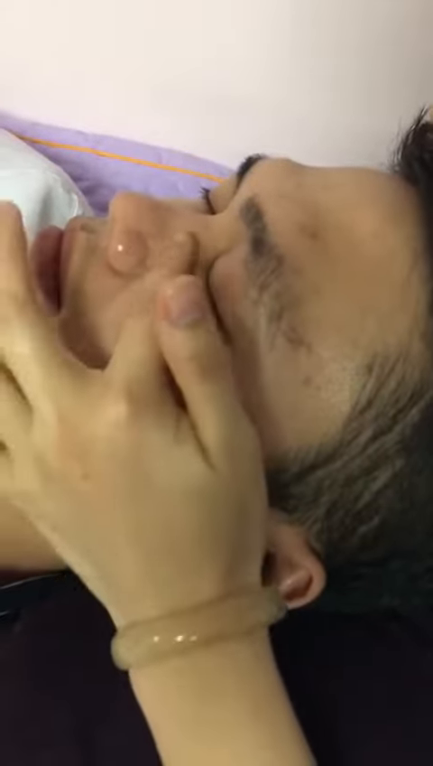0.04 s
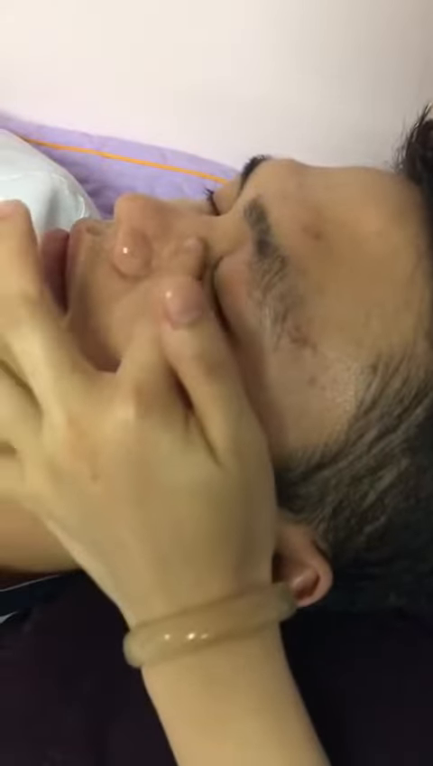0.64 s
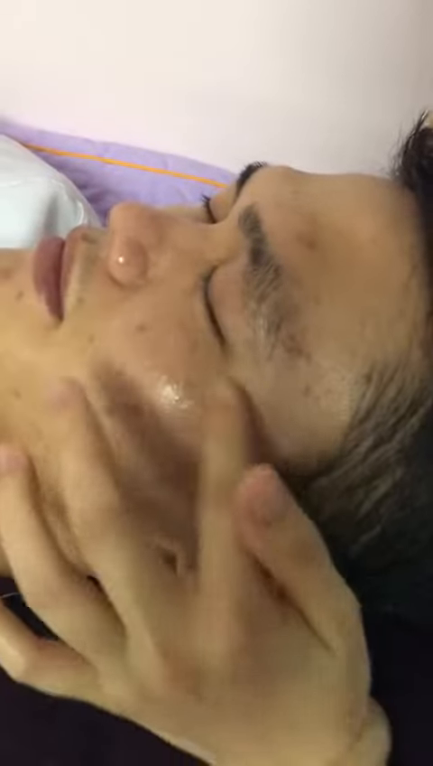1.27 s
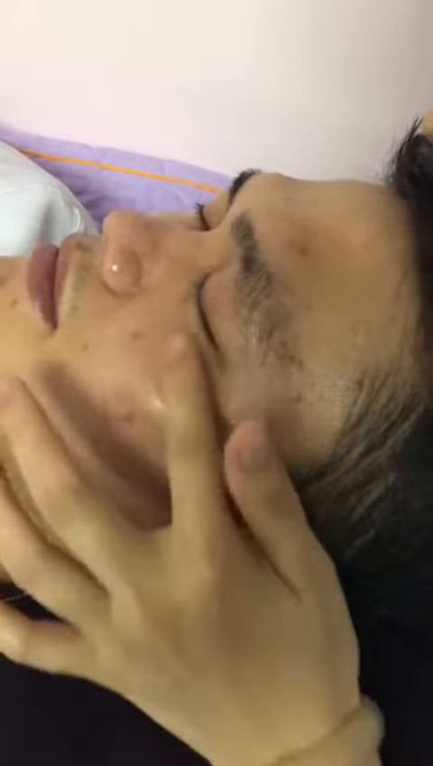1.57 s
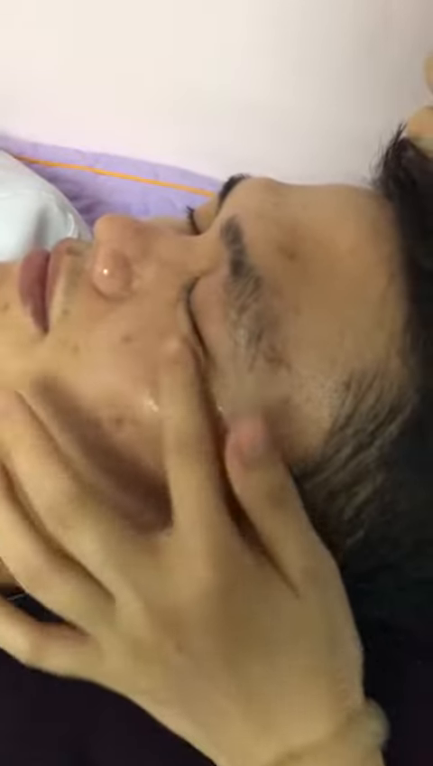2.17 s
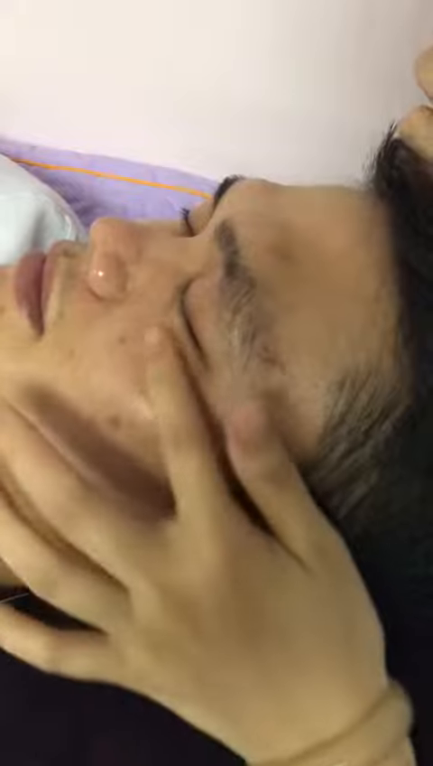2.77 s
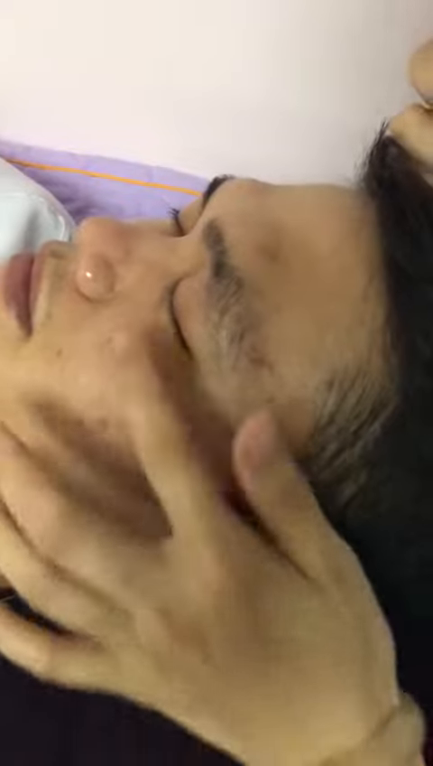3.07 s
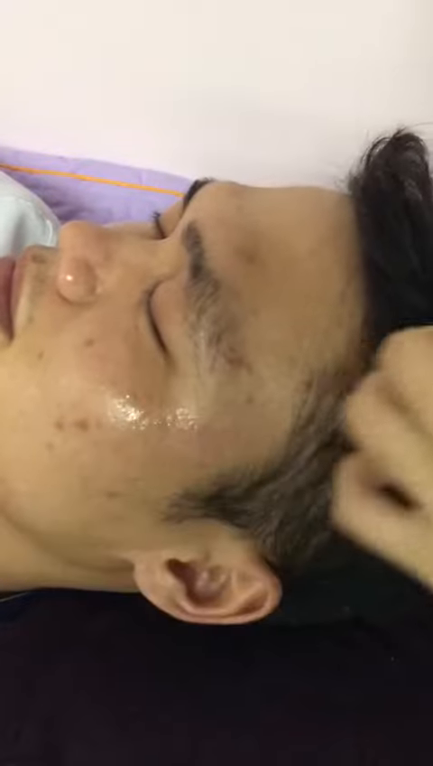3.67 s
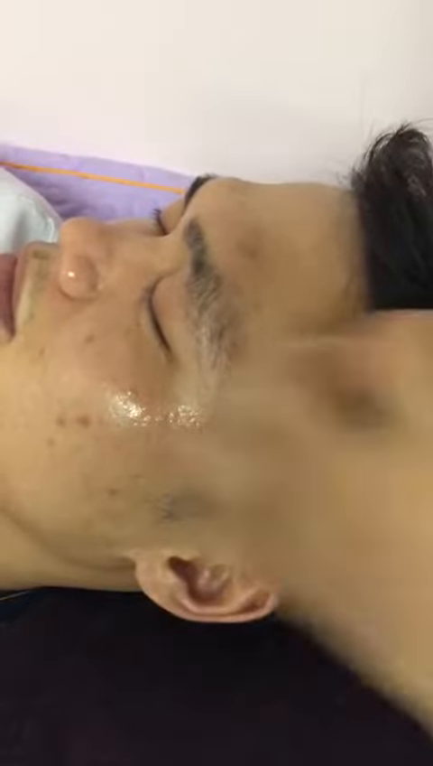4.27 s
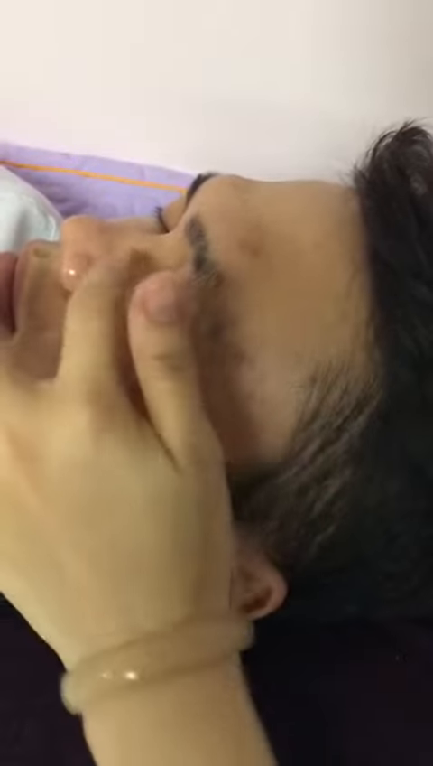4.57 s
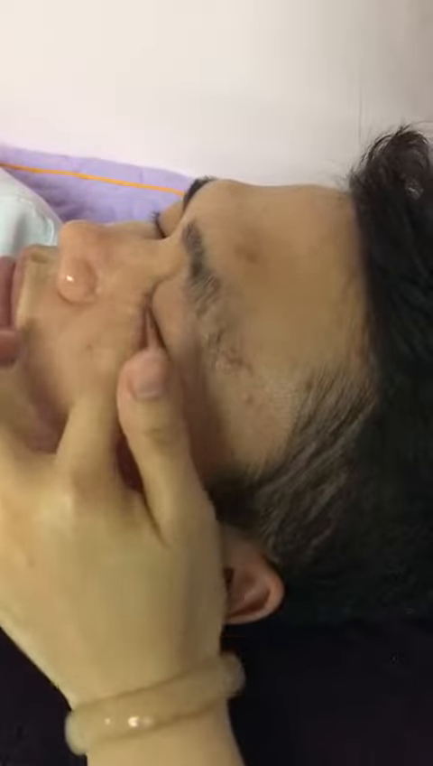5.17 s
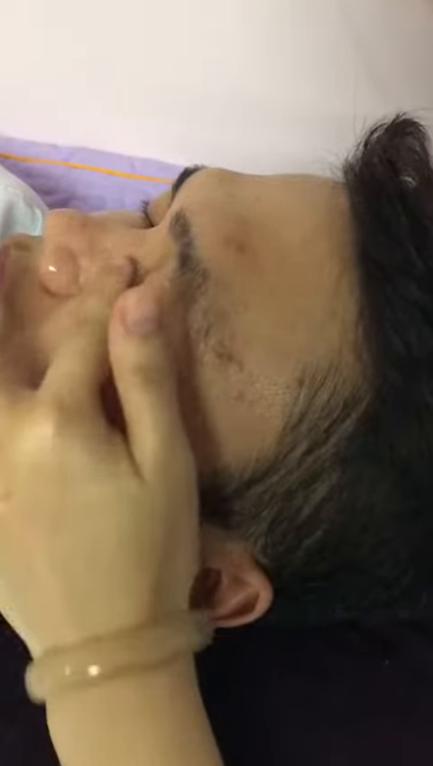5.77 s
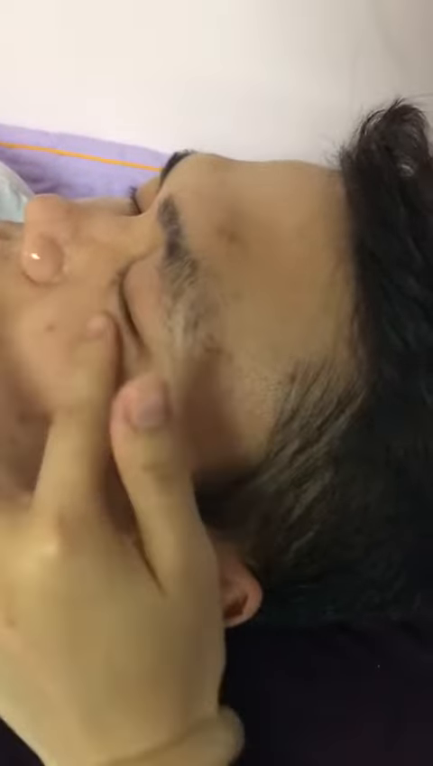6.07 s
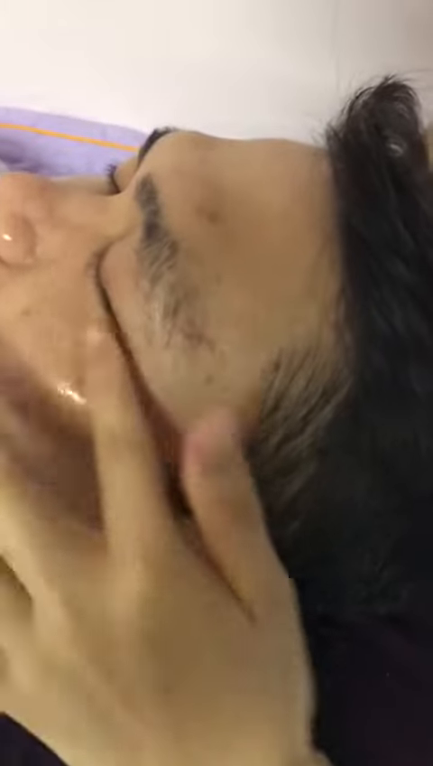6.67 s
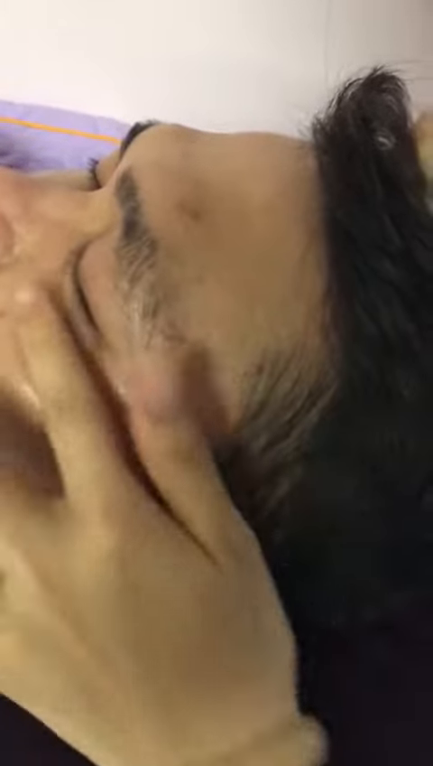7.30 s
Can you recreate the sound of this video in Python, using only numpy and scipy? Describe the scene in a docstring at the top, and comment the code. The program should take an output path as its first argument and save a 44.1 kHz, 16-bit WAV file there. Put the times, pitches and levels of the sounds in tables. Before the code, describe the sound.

A vacuum pump runs steadily in a small room, with a low throbbing electric hum, rushing air and a faint pulsing hiss.

```python
"""A vacuum pump runs in a small room. From the start its strokes throb, its induction motor hums and
whines, and air rushes; a worn ball bearing grumbles through the housing, its cage swishing and ticking.
Near 1.4 s the cage rubs harder. Around 3.6 s come a first faint squeak and a dip in the deep tone; the
whirr swells and sinks, and near 5 s the bearing runs dry for a while. Just after 6 s the cage rubs
hardest, with a last squeak and a hollow bump, and bands of the rush stand out towards the end."""
import sys
import numpy as np
from scipy import signal
from scipy.fft import rfft, irfft
from scipy.io import wavfile
from scipy.ndimage import uniform_filter1d

SR = 44100
rng = np.random.default_rng(int(sys.argv[2]) if len(sys.argv) > 2 else 0)


def to_wav(s):
    """Save 16-bit WAV."""
    ch = np.atleast_2d(s).T  # columns
    pcm = np.round(np.clip(ch, -1, 1) * 32767)  # PCM
    wavfile.write(sys.argv[1], SR, pcm.astype(np.int16))


N = 332514
TIME = np.arange(N) / SR
BIN_HZ = np.fft.rfftfreq(N, 1 / SR)
SHAFT_HZ, CAGE_HZ, MAINS_HZ = 24.364, 9.037, 49.985
FIRST_SWISH_S = 0.085


def amp(db):
    """Decibels to gain."""
    return 10 ** (np.asarray(db) / 20)


def unit(x):
    """Scales to rms 1."""
    return x / np.sqrt(np.mean(x ** 2) + 1e-20)


def bell(x):
    """A smooth hump around zero, of half width 1."""
    return np.exp(-np.minimum(x ** 2, 20))


def colour(points):
    """An EQ curve: gain at every bin, from (Hz, dB) points joined on a log-frequency axis."""
    hz, db = np.transpose(points)
    return amp(np.interp(np.log(BIN_HZ + 1), np.log(hz), db))


def noise(gain):
    """Noise of rms 1, shaped by a gain at every bin."""
    real, imaginary = rng.standard_normal((2, len(BIN_HZ)))
    return unit(irfft(gain * (real + 1j * imaginary), N))


def noise_band(hz, half_width_hz):
    """A bell-shaped band of noise, rms 1."""
    return noise(bell((BIN_HZ - hz) / half_width_hz))


def drift(rate_hz):
    """Random modulation of rms 1, up to about rate_hz."""
    return noise(bell(BIN_HZ / rate_hz))


def tone(hz, db, waver=0.06):
    """A sine that wavers slightly in level and phase."""
    angle = 2 * np.pi * (hz * TIME + rng.random())
    knots_s = np.linspace(0, TIME[-1], 40)
    swell = np.interp(TIME, knots_s, waver * rng.standard_normal(len(knots_s)))
    lag = np.interp(TIME, knots_s, waver * rng.standard_normal(len(knots_s)))
    return np.sqrt(2) * amp(db) * (1 + swell) * np.sin(angle + lag)


# The pump's tones, deepest first. Each row: multiple of the shaft speed, level in dB.
PUMP_TONES = [(2, -36.5), (3, -48), (4, -55), (5, -68), (6, -48), (7, -61), (8, -59.5), (9, -59.5),
              (10, -53), (12, -58), (13, -46), (14, -59.5), (15, -60), (17, -60), (19, -71), (39, -67.5)]


def pump(dip_s=3.68, dip_half_s=0.22, dip_db=-2):
    """Two strokes a turn give the deep tone, which dips once; the other shaft orders make it throb."""
    deep, *others = (tone(order * SHAFT_HZ, db, waver=0.032) for order, db in PUMP_TONES)
    dip = amp(dip_db * bell((TIME - dip_s) / dip_half_s))
    return deep * dip + sum(others)


# Magnetic hum. Each row: multiple of the mains, multiple of the shaft speed added, level in dB.
HUM_TONES = [(2, 0, -51.5), (2, 1, -46.5), (2, 2, -58), (4, 0, -60.5), (8, 0, -65)]
# Rotor-bar whine. Each row: multiple of the mains added to the bar rate, level in dB.
WHINE_TONES = [(4, -66), (6, -73), (8, -68), (10, -69), (12, -84)]


def motor(rotor_bars=30):
    """The magnetic pull beats with the off-centre rotor and with its passing bars."""
    hum = sum(tone(mains * MAINS_HZ + shaft * SHAFT_HZ, db, waver=0.013)
              for mains, shaft, db in HUM_TONES)
    bar_hz = rotor_bars * SHAFT_HZ
    whine = sum(tone(bar_hz + mains * MAINS_HZ, db, waver=0.2) for mains, db in WHINE_TONES)
    return hum + whine


# EQ of the housing as the rolling balls shake it. Each row: frequency in Hz, relative level in dB.
HOUSING_EQ = [(150, -6.5), (260, -3.5), (370, 1.5), (450, -2.5), (500, -3), (635, -15.5), (658, -3),
              (760, -5), (810, -4.5), (945, -4), (1030, -15), (1095, 0), (1165, -11), (1205, -4),
              (1370, -43)]
# Shaft orders split by the bearing. Each row: multiple of the shaft speed,
# multiple of the cage speed added, level in dB.
BEARING_TONES = [(2, 1, -63), (4, -3, -56.5), (4, -1, -57.5), (6, -1, -69.5), (6, 1, -69), (7, -2, -64.5),
                 (7, -1, -63.5), (9, 1, -61.5), (10, -1, -58), (10, 1, -57.5), (14, 1, -60), (15, -1, -65),
                 (15, 1, -65.5), (17, -1, -63), (30, -1, -74), (34, -2, -66), (37, -1, -71.5),
                 (46, -3, -74)]


def grumble(thicket_db=-52.5, uneven_db=7.5):
    """Bumps in the races recur with shaft and cage: a thicket of tones, a few of them strong."""
    shaft_orders, cage_orders = np.meshgrid(np.arange(4, 70), np.arange(-4, 5))
    tone_hz = shaft_orders * SHAFT_HZ + cage_orders * CAGE_HZ
    bins = np.round(tone_hz * N / SR).astype(int)
    gains = amp(uneven_db * rng.uniform(-0.42, 1, bins.shape))
    spectrum = np.zeros(len(BIN_HZ), complex)
    spectrum[bins] = gains * np.exp(2j * np.pi * rng.random(bins.shape))
    thicket = amp(thicket_db) * unit(irfft(spectrum * colour(HOUSING_EQ), N))
    strong = sum(tone(shaft * SHAFT_HZ + cage * CAGE_HZ, db, waver=0.079)
                 for shaft, cage, db in BEARING_TONES)
    return thicket + strong


# EQ of the air rush and room rumble. Each row: frequency in Hz, relative level in dB.
AIR_EQ = [(22, -13), (45, -5.5), (68, 0.4), (105, -4.5), (160, -7.8), (200, -9.5), (400, -12.5), (560, -23),
          (1200, -23.5), (1380, -28.5), (1900, -31.5), (2300, -30), (2900, -31.5), (4900, -42.5),
          (11500, -55.5)]
# Bands of the rush that fade in and out. Each row: peak time in seconds, half length in seconds,
# centre in Hz, half width in Hz, peak level in dB.
RUSH_SWELLS = [(0.93, 0.33, 2450, 200, -72), (1, 2.2, 3060, 270, -76), (3.7, 0.37, 3500, 240, -71.5),
               (4.5, 1.3, 1650, 270, -72.5), (6.4, 0.33, 2520, 500, -68), (6.24, 0.58, 3200, 1100, -70),
               (7.4, 0.5, 3000, 260, -67.5), (7, 0.59, 4000, 260, -74), (6.44, 0.73, 500, 110, -62),
               (7.3, 0.3, 470, 100, -59), (7.4, 0.6, 860, 220, -59)]


def air(level_db=-45.5, swell_db=0.66, flicker_db=2.7):
    """A bed of cooling air and room rumble, slowly shifting in colour, with a faint low drone in it."""
    rush = amp(level_db + swell_db * drift(3.8)) * noise(colour(AIR_EQ))
    for peak_s, half_s, hz, half_width_hz, db in RUSH_SWELLS:
        envelope = amp(db + flicker_db * drift(28)) * bell((TIME - peak_s) / half_s)
        rush += envelope * noise_band(hz, half_width_hz)
    drone = tone(hz=69.4, db=-58)
    return rush + drone


# EQ of the cage's dry rubbing. Each row: frequency in Hz, relative level in dB.
RUB_EQ = [(2500, -67), (4100, -3.5), (4650, 0), (4900, -4), (5300, 1), (6000, 3), (7100, 1.5), (7550, -1),
          (8500, 2.5), (9600, 0.5), (10350, -3.5), (11200, -0.5), (11800, -12.5)]
# Modes of the bearing rings. Each row: centre in Hz, half width in Hz, peak level in dB against
# the rubbing, peak time in seconds, half length in seconds.
STEEL_MODES = [(4130, 80, -16, 0.2, 1.0), (5160, 67, -11, 2.6, 0.96), (5820, 55, -18, 3.8, 0.8),
               (5800, 36, -13, 3, 2.4), (6260, 40, -11, 3.2, 0.8), (6300, 75, -11, 4.4, 0.99),
               (6840, 33, -8, 2.7, 0.8), (6940, 65, -18, 8, 1.3), (7170, 55, -12, 5.6, 1.6)]


def steel_hiss(rest_gain=0.43):
    """The rubbing hiss rings in the bearing's steel, now in one mode, now in another."""
    hiss = noise(colour(RUB_EQ))
    for hz, half_width_hz, db, peak_s, half_s in STEEL_MODES:
        envelope = rest_gain + (1 - rest_gain) * bell((TIME - peak_s) / half_s)
        hiss += amp(db) * envelope * noise_band(hz, half_width_hz)
    return hiss


def patchy(sound, depth_db):
    """Lets neighbouring bands rise and sink on their own, so that no two swishes have the same colour."""
    frames = signal.stft(sound, nperseg=512)[2]
    patches = uniform_filter1d(rng.standard_normal(frames.shape), size=7, axis=0)  # across frequency
    patches = uniform_filter1d(patches, size=9, axis=1)  # across time
    return signal.istft(frames * amp(depth_db * unit(patches)), nperseg=512)[1][:N]


# Spells where the hiss grows louder or pulses less deeply. Each row: peak time in seconds,
# half length in seconds, level boost in dB, change in pulse depth in dB.
HISS_SPELLS = [(1.4, 0.66, 2.5, -1.1), (2.8, 0.3, 0, -0.5), (3.95, 0.38, 1.4, 0), (4.7, 0.35, 1, 0),
               (6.15, 0.58, 3, -0.5)]


def swish(level_db=-61.5, depth_db=3.5, slip_turns=0.004, dry_s=4.9, dry_half_s=0.81, dry_db=0.6):
    """The cage rubs harder once a turn; while the bearing runs dry, each swish stands out further."""
    for peak_s, half_s, boost_db, depth_change_db in HISS_SPELLS:
        spell = bell((TIME - peak_s) / half_s)
        level_db += boost_db * spell
        depth_db += depth_change_db * spell
    depth_db += dry_db * bell((TIME - dry_s) / dry_half_s)
    cage_turns = CAGE_HZ * (TIME - FIRST_SWISH_S) + slip_turns * drift(2)
    pulse_db = depth_db * np.cos(2 * np.pi * cage_turns)
    shaft_angle = 2 * np.pi * SHAFT_HZ * TIME
    pulse_db += 0.63 * np.cos(shaft_angle)  # the rotor presses once a turn
    pulse_db += 0.24 * np.cos(2 * shaft_angle)  # the pump strokes twice
    pulse_db += 0.45 * drift(40) + 0.53 * drift(300)  # unevenness and fine grain
    hiss = patchy(steel_hiss(), depth_db=1.84)
    return amp(level_db) * unit(hiss * amp(pulse_db))


def ticks(level_db=-72, decay_s=0.021, scatter_db=1):
    """Twice a turn the loose cage drops against the balls with a faint tick."""
    half_turns = 2 * CAGE_HZ * (TIME - FIRST_SWISH_S) + 2  # + 2 keeps the count positive
    tick_index = half_turns.astype(int)
    strength = amp(scatter_db * rng.standard_normal(tick_index[-1] + 1))[tick_index]
    age_s = half_turns % 1 / (2 * CAGE_HZ)
    ring = noise_band(hz=3850, half_width_hz=750)
    return amp(level_db) * unit(ring * strength * np.exp(-age_s / decay_s))


# Fader ride on the whirr. Each row: time in seconds, boost or cut in dB.
WHIRR_RIDE = [(0, 0), (2.5, 0.5), (3.45, -0.5), (3.75, 1.8), (4.3, 2), (4.7, 0), (5.2, -2), (5.65, 3),
              (6.05, -0.5), (6.3, 2), (6.75, -1.7), (7.1, 0.8), (7.54, -0.5)]


def whirr(sound, centre_hz=1150, half_width_hz=220, flutter_db=0.05):
    """One midrange band of the machine's sound swells, sinks and flutters slightly."""
    band = irfft(rfft(sound) * bell((BIN_HZ - centre_hz) / half_width_hz), N)
    gain_db = np.interp(TIME, *np.transpose(WHIRR_RIDE)) + flutter_db * drift(17)
    return sound + (amp(gain_db) - 1) * band


# Four faint squeaks, then a hollow bump. Each row: peak time in seconds, half length in seconds,
# pitch in Hz, pitch wobble in Hz, peak level in dB.
SQUEAKS_AND_BUMP = [(3.54, 0.09, 3300, 70, -69), (4.37, 0.019, 3040, 60, -65), (5.33, 0.04, 1760, 50, -65),
                    (6.285, 0.029, 3100, 60, -69), (6.295, 0.028, 519, 20.5, -51.5)]


def blip(peak_s, half_s, hz, wobble_hz, db):
    """A brief, soft tone of unsteady pitch: a squeak when high, a bump when low."""
    angle = 2 * np.pi * np.cumsum(hz + wobble_hz * drift(89)) / SR
    return np.sqrt(2) * amp(db) * bell((TIME - peak_s) / half_s) * np.sin(angle)


def scene():
    """The mono mix: the machine's body, the cage's swishes and ticks on top, then the spot sounds."""
    body = pump() + whirr(motor() + grumble() + air())
    cage = swish() + ticks()
    spots = sum(blip(*row) for row in SQUEAKS_AND_BUMP)
    return (body + cage + spots)[None]


def record(dry):
    """A steep low-pass takes the very top off the mix."""
    cutoff_hz = 11900
    lowpass = signal.firwin(401, cutoff_hz, window=("kaiser", 9), fs=SR)
    return signal.oaconvolve(dry, lowpass[None], "same")


dry = scene()
out = record(dry)
to_wav(out)
```